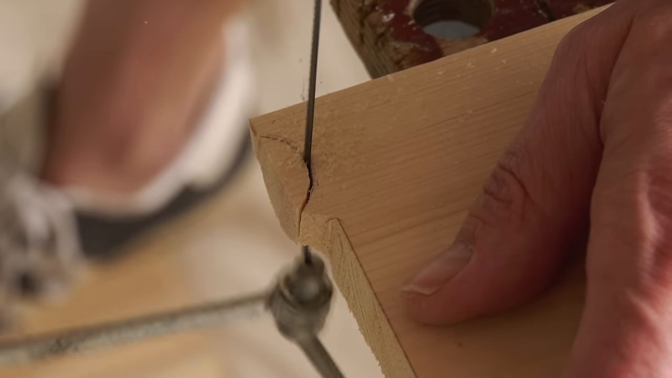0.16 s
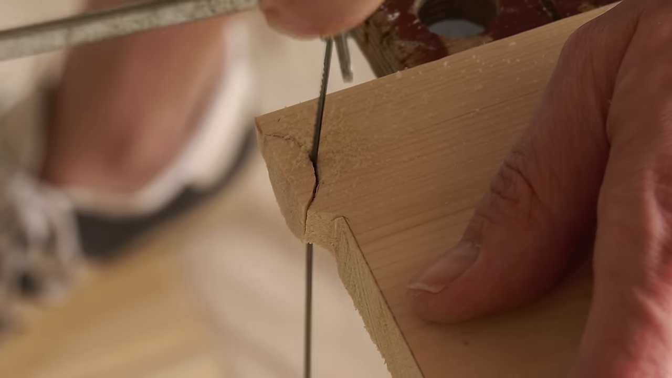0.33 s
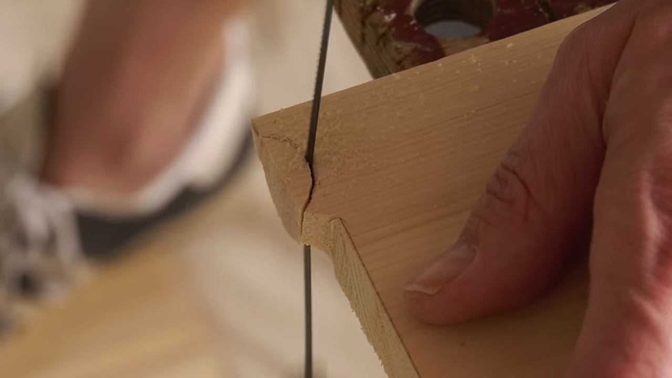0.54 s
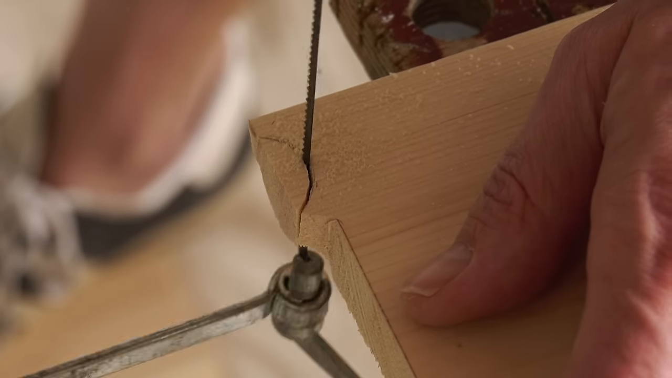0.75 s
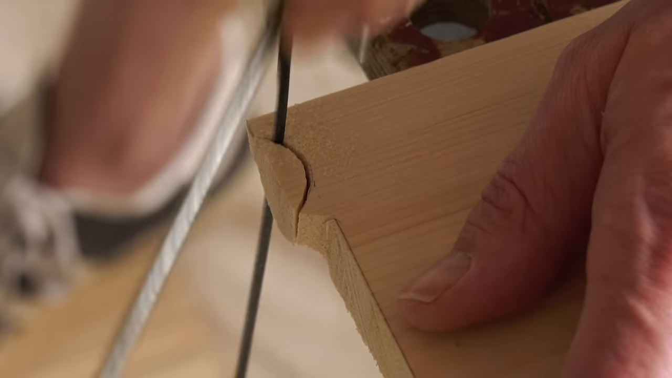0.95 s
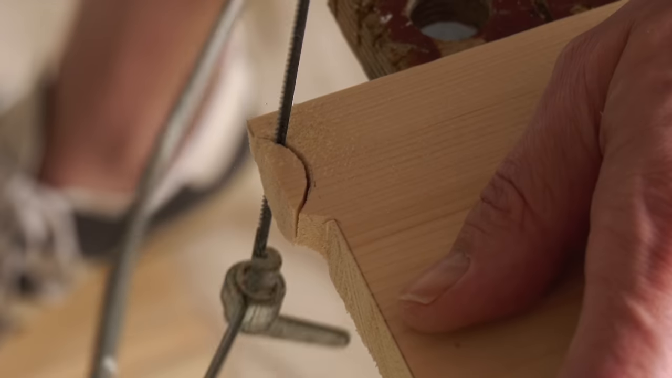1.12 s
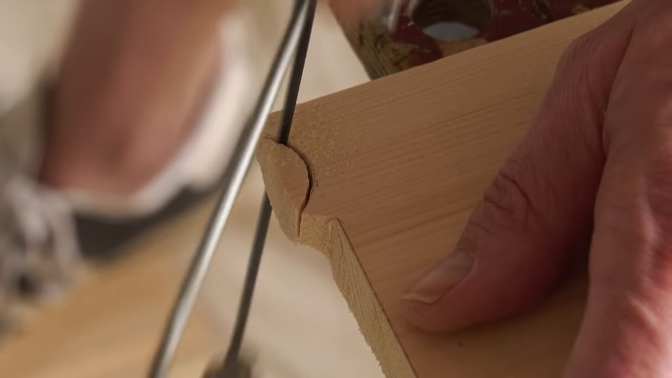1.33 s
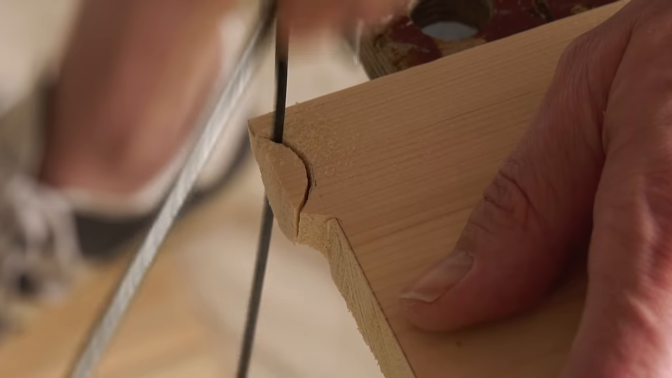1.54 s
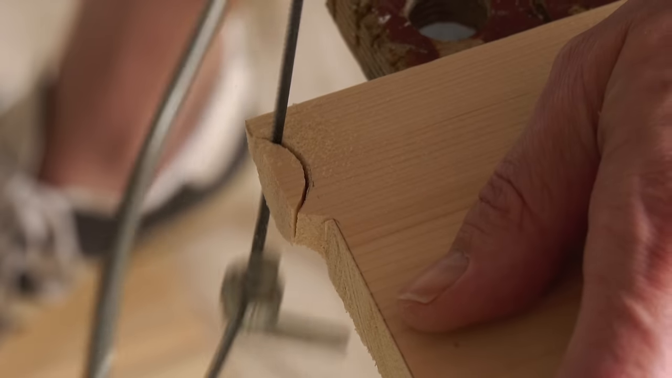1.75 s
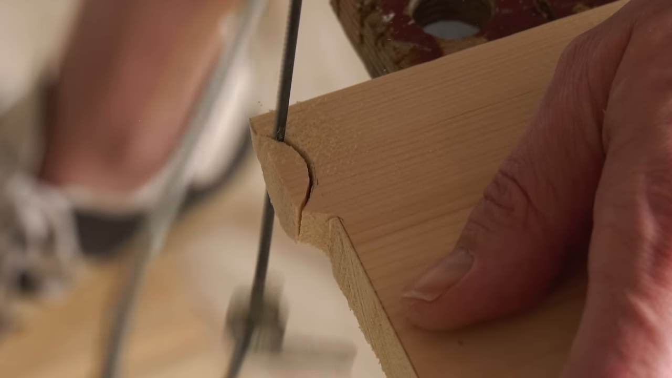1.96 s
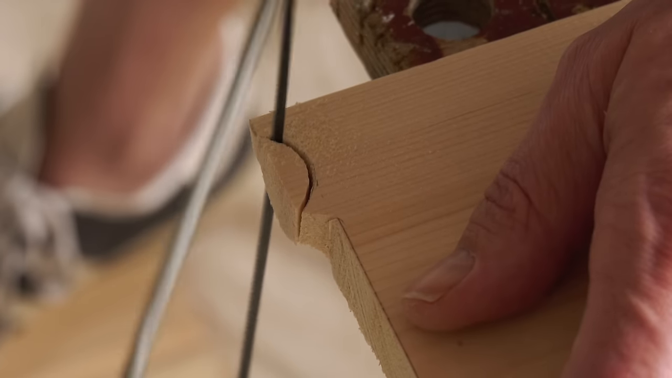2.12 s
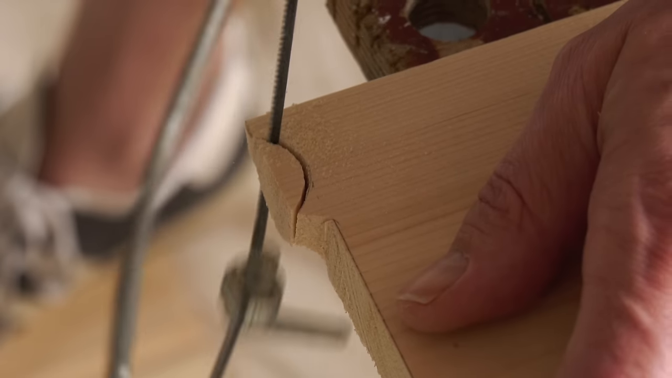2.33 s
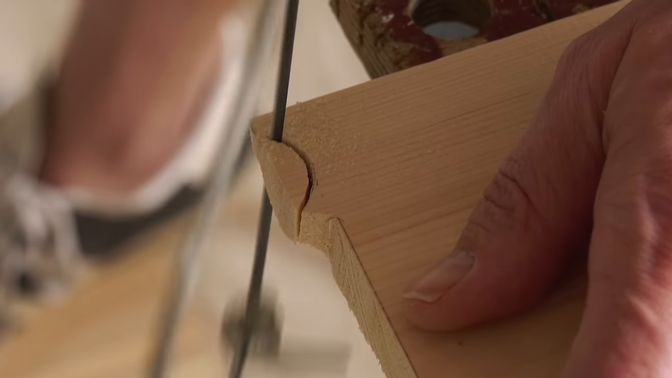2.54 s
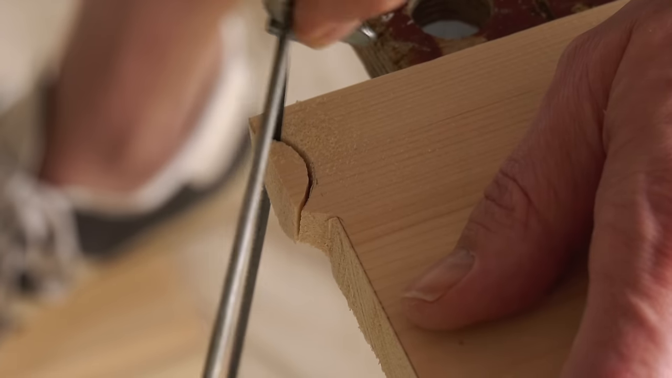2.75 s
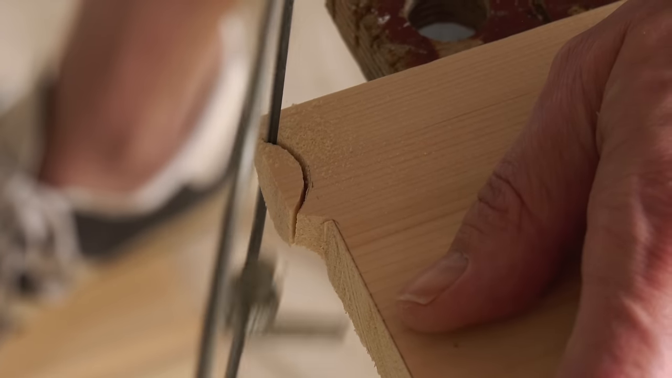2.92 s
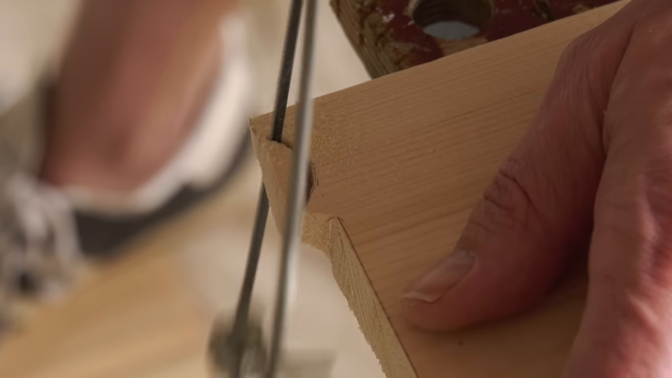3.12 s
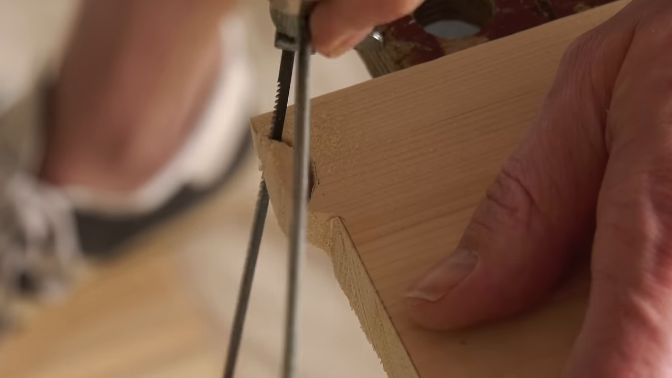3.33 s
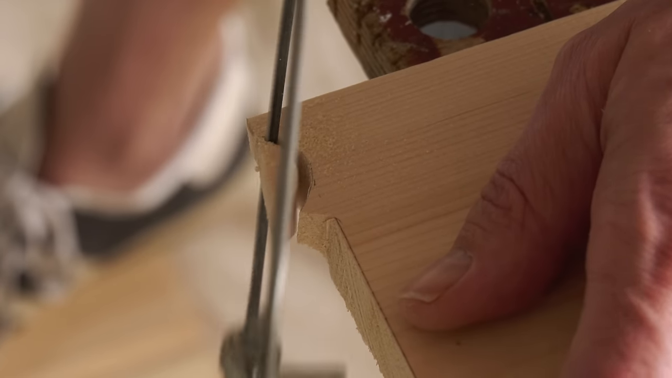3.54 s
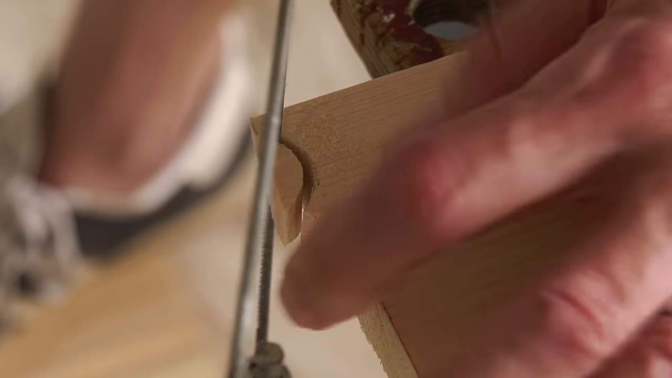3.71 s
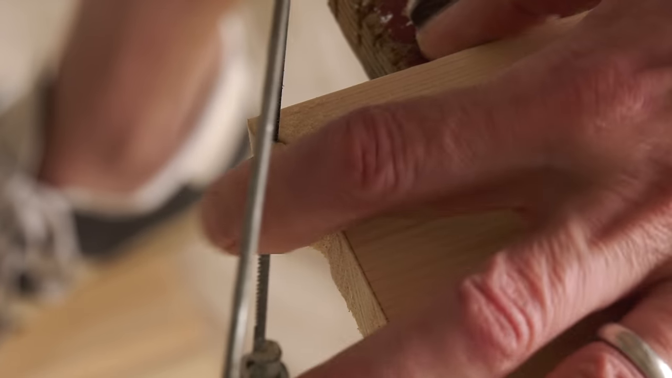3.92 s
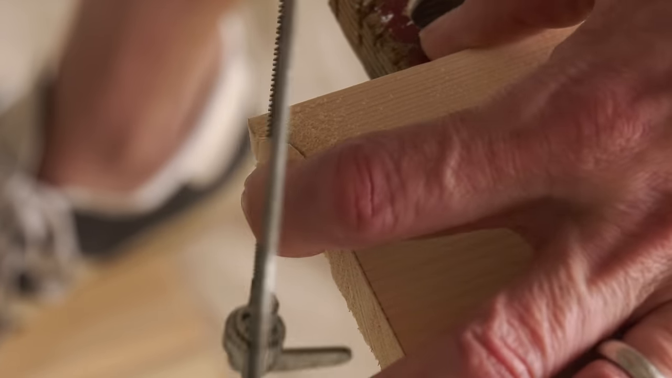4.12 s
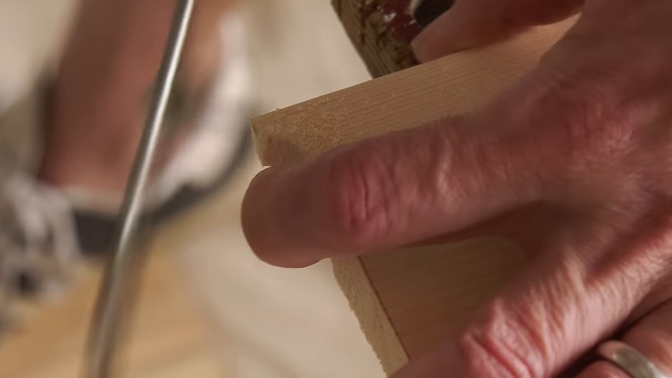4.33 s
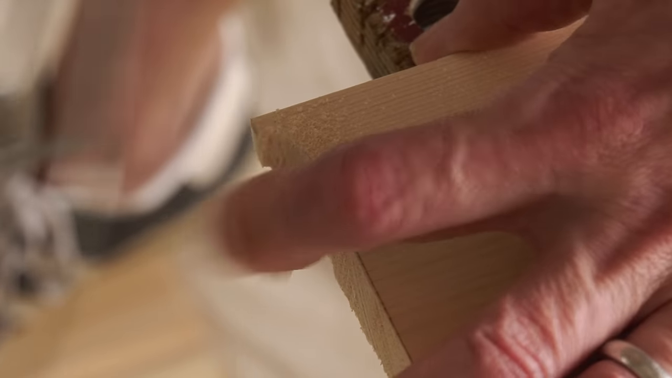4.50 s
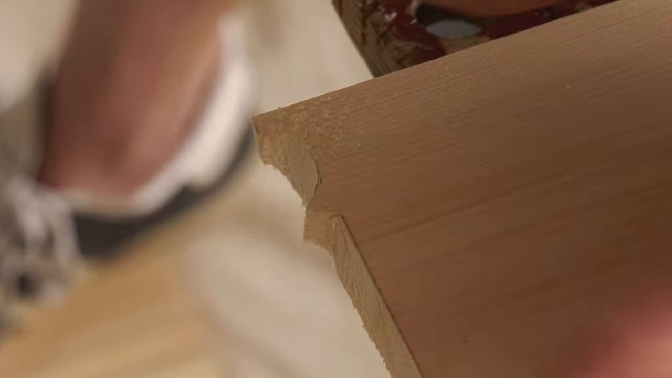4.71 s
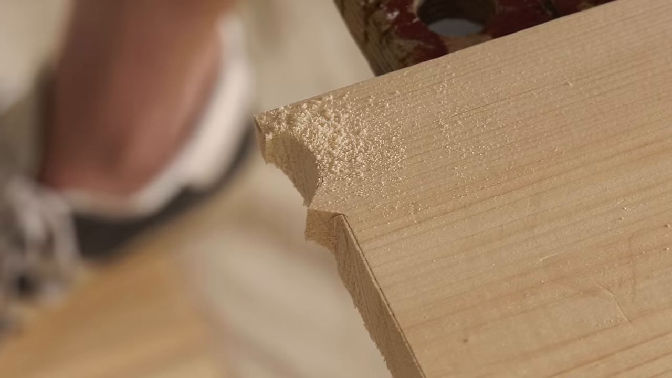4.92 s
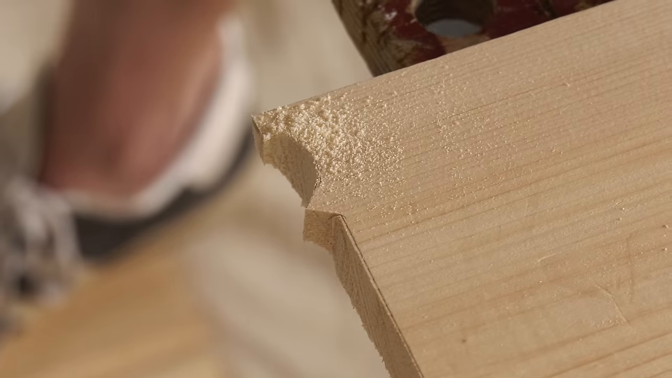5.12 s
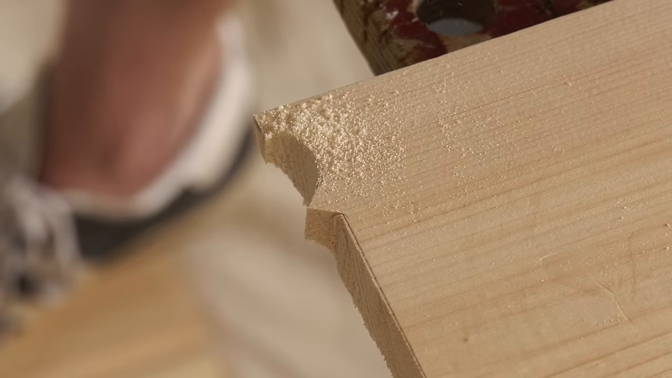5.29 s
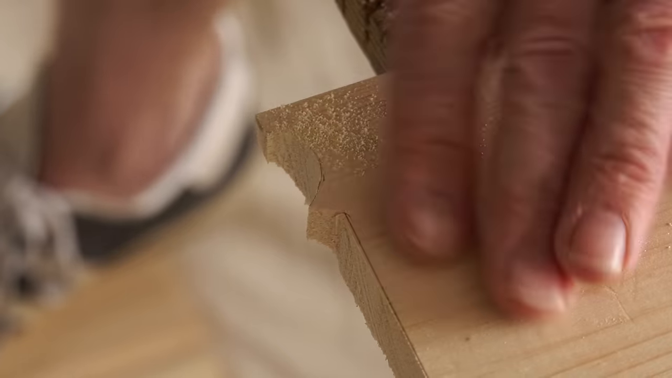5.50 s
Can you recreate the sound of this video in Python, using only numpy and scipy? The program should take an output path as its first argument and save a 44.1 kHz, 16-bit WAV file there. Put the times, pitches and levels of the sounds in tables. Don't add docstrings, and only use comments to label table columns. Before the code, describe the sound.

A coping saw rasps in quick buzzing strokes through softwood, softens, is wriggled free with a snap, then an offcut drops and fingers wipe dust.

```python
import sys
import numpy as np
from scipy import signal
from scipy.fft import rfft, irfft, next_fast_len
from scipy.io import wavfile

SR = 44100
rng = np.random.default_rng(int(sys.argv[2]) if len(sys.argv) > 2 else 0)


def decibels_to_gain(level_db):
    exponent = np.asarray(level_db, float) / 20
    return 10 ** exponent


def wav_record(signal):
    frames = np.transpose(np.atleast_2d(signal))
    bounded = np.clip(frames, -1, 1)
    quanta = np.round(bounded * 32767).astype(np.int16)
    wavfile.write(sys.argv[1], SR, quanta)


N = 249585
TIME = np.arange(N) / SR
PADDED = next_fast_len(N + SR)
HZ = np.maximum(np.arange(PADDED // 2 + 1) * SR / PADDED, 1)

# start_s, length_s, top_teeth_per_s, bite_db, grit_db
PULLS = [(-.03, .12, 530, -17, -31), (0.256, .121, 552, -13, -34.5), (0.542, .116, 530, -17, -36),
         (0.819, .133, 460, -30, -37.5), (0.942, .115, 570, -25, -30), (1.23, .12, 550, -28.5, -31.5),
         (1.52, .125, 590, -26.5, -31), (1.823, .116, 590, -31.5, -28.5), (2.115, .12, 580, -31.5, -29),
         (2.408, .127, 510, -31, -28.5), (2.7, .122, 510, -33, -29.5), (2.992, .117, 592, -27, -28),
         (3.292, .12, 400, -36.5, -33), (3.57, 0.11328, 492.7, -40, -47.5), (4.061, .14, 510, -43, -75),
         (4.233, 0.11455, 502.2, -44.5, -45)]
# brake_s, strike_sharpness_db, double_strike_db, catch_db (teeth catch as arm brakes)
PULL_FORM = [(.05, 2.5, 5, 4), (.058, -2, 1.5, 4.5), (0.05, 0, 4.5, 2.5), (0.056, 3.5, -12, 7),
             (.042, 0, 0, 5.5), (0.05, -4, -8.5, 8.5), (0.056, -1, -10.5, 7.5), (0.041, 1.5, -3, 7),
             (0.033, -7.5, -11, -0.5), (0.03315, -12.5, 7.5, -2.5), (0.054, -1.5, 0, 5.5),
             (.048, -15.5, 2.5, 8.5), (.07, 1.5, 4.5, 3), (0.0504, -10, -8, 0.1), (.055, 2, 0, -2),
             (.057, 6.5, -2, 5)]
# start_s, length_s, top_teeth_per_s, bite_db, grit_db
PUSHES = [(0.096, .14, 455, -33, -43), (0.384, 0.14, 440, -29.5, -43), (0.664, 0.135, 470, -30.5, -40),
          (1.066, .14, 450, -43.5, -37.5), (1.36, 0.14, 425, -48.5, -37.5), (1.656, .142, 465, -45, -36.5),
          (1.949, .145, 420, -54, -35), (2.257, 0.132, 350, -44.5, -35), (2.548, .138, 445, -42, -34),
          (2.834, .14, 460, -46.5, -33.5), (3.121, 0.145, 403, -33.5, -37), (3.407, 0.15, 430, -47, -44.5)]
# time_s, grit_into_board_db, bench_rumble_db, overtones_db, blade_sizzle_db
GRIP = [
    (0, 8, -12, -7.5, -7),
    (.45, 6, -10, -8.5, 0.5),
    (.9, 1.5, -13, -4, -1.5),
    (1.35, 2.2, -17.5, 6.5, 1.5),
    (1.8, -0.2, -17.5, 2.5, 0),
    (2.3, 1, -14, 9.5, -2),
    (2.8, -0.7, -20, 4.5, -2),
    (3.2, 1, -11, 2.5, -0.5),
    (3.7, 8.5, -22.5, -11, 1.5),
    (4.3, 8, -28, 0.5, 6.5),
]
# pitch_hz, width_hz, level_db
BOARD_MODES = [(352.3, 52, -1.5), (439.3, 28.5, 1.5), (502, 25.3, -2), (710, 82, 1.5), (830, 90, -3),
               (1003, 64, -0.5), (1217, 74, 0), (1372, 176, -2.5), (1724, 222, -3.5), (2665, 685, -6.5),
               (464.4, 26.2, -1), (1043, 42, -2)]
# pitch_hz, level_db
FACE_COLOUR = [(200, -25.5), (450, -11), (750, -6.5), (1100, 3), (1800, -16), (3000, -10), (6000, -18)]
# pitch_hz, width_hz, level_db
BLADE_MODES = [(3000, 234, 1), (3460, 260, 3), (3994, 314, 2.5), (5107, 800, -1.5), (6550, 440, -5),
               (7880, 3200, -12), (11450, 750, -25), (13800, 5700, -37)]
# pitch_hz, width_hz, level_db
BENCH_MODES = [(78.6, 40, -31), (121.4, 16.8, -3.5), (174.2, 19, 3), (226.5, 290, -16.5)]
# pitch_hz, level_db (per Hz)
HUSH_COLOUR = [(15, -34), (25, -7), (74, -1), (516, 2.5), (818, -2), (1700, -9), (1890, -12.5), (3920, -13),
               (11000, -24.5), (13200, -15), (16000, -28.5)]
# start_s, level_db, pitch_hz, t60_s
BUMP = [
    (.932, -30.5, 70, 0.019),
]
# start_s, level_db
KNOCKS = [
    (.929, 3.5),
    (0.993, -7),
    (2.422, -2),
    (2.472, 2),
    (4.1573, -5.5),
]
# start_s, length_s, peak_db
RUBS = [
    (3.64, 0.34, -60.5),
    (4.75, 0.27, -59.5),
    (5.04, 0.124, -62),
    (5.14, 0.3, -57.5),
]
# start_s, length_s, peak_db
WIPE = [
    (5.55, 0.26, -33),
]
# pitch_hz, level_db (per Hz)
SKIN_COLOUR = [(88, -57), (150, -16), (555, -15), (1480, -7.5), (1630, -13), (2400, -7.5), (2810, -11),
               (5680, -6.5), (16000, -15.5)]
# start_s, length_s, peak_db
LAST_SCRAPES = [
    (4.045, 0.17, -40),
    (4.225, 0.11, -32.5),
]
# pitch_hz, level_db (per Hz)
KERF_COLOUR = [(65, -26), (150, -12.5), (320, -10.5), (514, -5.5), (902, -12.5), (981, -13), (1580, -19),
               (3020, -23.5), (4400, -28), (5650, -22), (7250, -36), (10800, -31), (16000, -44)]
# start_s, peak_db, t60_s, low_edge_hz
TICKS = [(4.077, -52, 0.0072, 1510), (4.0882, -42, .008, 1500), (4.1121, -43, .008, 1490),
         (4.1315, -36, 0.0063, 3000), (4.153, -39, 0.015, 4370), (4.1545, -26.5, 0.014, 3560),
         (4.252, -37, 0.0051, 1500), (4.257, -39, .008, 3000), (4.2698, -29, 0.0099, 1980),
         (4.3095, -33, 0.017, 4000), (4.311, -30.5, 0.0073, 4950), (4.3111, -15.5, 0.0086, 3840),
         (4.312, -25, 0.013, 3950), (4.797, -48, 0.017, 3500), (4.914, -34, 0.013, 1540),
         (4.961, -28.5, 0.0029, 3000)]
# start_s, peak_db
DROP = [
    (4.9602, -19),
    (4.976, -35),
    (4.995, -39),
    (5.035, -43.5),
]
# pitch_hz, width_hz, level_db
OFFCUT_MODES = [(319, 60, 4.5), (404, 51, 6.5), (513, 85, 3.5), (637, 64, 8.5), (760, 170, 1),
                (954, 100, 5), (1257, 47, 8), (1580, 110, 5), (1920, 97, 3.5), (2380, 920, -0.5),
                (4800, 1700, -3.5), (8300, 4300, -36)]
# pitch_hz, t60_s
SHOP_T60 = [(90, 0.72), (200, 0.89), (450, 0.75), (1000, 0.66), (2200, 0.53), (5000, 0.11), (11000, 0.19)]
# pitch_hz, angle_rad (toward the side signal)
PORTS = [(100, 0.013), (3000, 0.28), (6000, 0.45), (9000, 0.89), (11500, 2.18), (15000, 1.6)]
# time_s, left_minus_right_db
DRIFT = [
    (0, 5),
    (.8, 6.5),
    (1.1, 3),
    (3.4, -.5),
    (5.66, -7.5),
]


def rms_one(x):
    return x / np.sqrt(np.mean(x ** 2) + 1e-20)


def response_rms_one(response):
    return response / np.sqrt(np.mean(abs(response) ** 2))


def lowpass(x, hz, order=2):
    return signal.sosfilt(signal.butter(order, hz, fs=SR, output="sos"), x)


def highpass(x, hz):
    return signal.sosfilt(signal.butter(2, hz, "high", fs=SR, output="sos"), x)


def at_hz(points):
    hz, value = np.transpose(points)
    return np.interp(np.log(HZ), np.log(hz), value)


def through(x, response):
    return irfft(rfft(x, PADDED) * response, PADDED)[..., :N]


def body(modes):
    total = 0
    for k, (hz, width, db) in enumerate(modes):
        damping = 1j * width * HZ
        total = total + (-1) ** k * decibels_to_gain(db) * damping / (hz ** 2 - HZ ** 2 + damping)
    return response_rms_one(total)


def flicker(rate_hz, depth_db):
    settle = 4000
    slow = lowpass(rng.standard_normal(N + settle), rate_hz)[settle:]
    return decibels_to_gain(depth_db * rms_one(slow))


def strokes(table, overtones, fall, late, later, surge, uneven_db):
    catch_at, catch_spread, catch_grit, heavy_lag = 0.81, 0.064, 0.74, 0.096
    rate, push, double, edge, grit = np.zeros((5, N))
    for start, rise_s, brake_s, sharp_db, double_db, catch_db, top_hz, bite_db, grit_db in table:
        fastest = start + rise_s
        stop = fastest + brake_s
        span = slice(max(int(start * SR), 0), int(stop * SR))
        now = TIME[span]
        speed = np.sin(np.pi / 2 * np.interp(now, [start, fastest, stop], [0, 1, 0])) ** 0.8
        dug = np.clip((now - start) / (stop - start), 0, 1)
        catch_now_db = catch_db * np.exp(-((dug - catch_at) / catch_spread) ** 2)
        heavy_db = 1.07 * catch_db * np.exp(-((dug - catch_at - heavy_lag) / catch_spread) ** 2)
        strike = decibels_to_gain(bite_db + sharp_db + 4 + catch_now_db) * speed ** 1.5
        waiting = dug ** (4.2 * late) * (dug / 0.85) ** min(later * max(start, 0), 2.5)
        bearing_down = 1 + surge * dug ** 9.6
        rate[span] += top_hz * speed
        push[span] += decibels_to_gain(bite_db + 15 + heavy_db) * speed ** 1.2 * waiting
        double[span] += decibels_to_gain(double_db) * strike * speed * dug ** (0.5 * late)
        edge[span] += strike * (1.45 - dug)
        grit[span] += decibels_to_gain(grit_db - 1.5 + catch_grit * catch_now_db) * speed ** fall * bearing_down
    turn = 2 * np.pi * np.cumsum(rate * flicker(100, uneven_db)) / SR
    harmonic_db = [-3.0, -10.5, -12.0, -4.5, -7.5, -13]
    sharp = sum(decibels_to_gain(db) * np.cos(k * turn) for k, db in enumerate(harmonic_db, 3))
    buzz = push * np.cos(turn) + overtones * (double * np.cos(2 * turn) + edge * sharp)
    fibres = rng.standard_normal(N) * decibels_to_gain(1.8 * rng.standard_normal(N)) * (1 + 0.5 * np.cos(turn))
    return decibels_to_gain(-12) * buzz * flicker(50, 1.5), grit * rms_one(fibres) * flicker(60, 0.7), rate


def pull_strokes(overtones):
    table = []
    for (start, length, *rest), (brake, *form) in zip(PULLS, PULL_FORM):
        table.append((start, length - brake, brake, *form, *rest))
    return strokes(table, overtones, fall=1.0, late=0.85, later=4.2, surge=1.0, uneven_db=0.1)


def push_strokes(overtones):
    brake_s, sharp_db, double_db, catch_db = 0.065, 3.5, -2, 0
    table = [(start, length - brake_s, brake_s, sharp_db, double_db, catch_db, *rest)
             for start, length, *rest in PUSHES]
    buzz, grit, rate = strokes(table, overtones, fall=0.55, late=0.2, later=0, surge=0.14, uneven_db=0.2)
    return buzz, 0.97 * grit + 0.37 * lowpass(grit, 6100), rate


def ringing_board(buzz, grit, grit_db):
    ringing = body(BOARD_MODES)
    board = through(decibels_to_gain(-3.0) * buzz + decibels_to_gain(grit_db) * grit * flicker(43, 1.1), ringing)
    low_gain = np.sqrt(np.mean(abs(ringing[HZ < 2000]) ** 2))
    return board + through(buzz, decibels_to_gain(-6 + at_hz(FACE_COLOUR)) * low_gain)


def ringing_blade(buzz, grit, sizzle_db):
    patch_hz, sizzle_hz = 604, 5900
    modes = body(BLADE_MODES)
    share = np.cos(np.pi / 2 * HZ / patch_hz) ** 2
    blade = decibels_to_gain(-6) * through(buzz * flicker(38, 3.2), modes)
    for patches in (share, 1 - share):
        flaring = decibels_to_gain(4.0) * grit * flicker(37, 1.8) * flicker(4.5, 0.33)
        blade = blade + through(flaring, patches * modes)
    sizzle = through(blade, 1 / (1 + (sizzle_hz / HZ) ** 6))
    return blade + (decibels_to_gain(sizzle_db) - 1) * sizzle


def bench_rumble(rate, level_db):
    shaking = decibels_to_gain(level_db - 34.0) * (rate / 450) ** 0.18 * rng.standard_normal(N)
    return through(shaking, body(BENCH_MODES))


def saw():
    times, *columns = np.transpose(GRIP)
    board_db, bench_db, overtone_db, sizzle_db = (np.interp(TIME, times, column) for column in columns)
    overtones = decibels_to_gain(overtone_db)
    buzz, grit, rate = np.add(pull_strokes(overtones), push_strokes(overtones))
    board = ringing_board(buzz, grit, board_db)
    return board + ringing_blade(buzz, grit, sizzle_db) + bench_rumble(rate, bench_db)


def hush():
    return decibels_to_gain(-61.5) * rms_one(through(rng.standard_normal(N), decibels_to_gain(at_hz(HUSH_COLOUR))))


def shop(x):
    after, echoes = np.arange(SR) / SR, 0
    for hz, t60 in SHOP_T60:
        band = signal.butter(1, [hz / 1.49, hz * 1.376], "band", fs=SR, output="sos")
        echoes = echoes + signal.sosfilt(band, rng.standard_normal(SR)) * decibels_to_gain(-60 * after / t60)
    echoes = echoes * (1 - np.exp(-after / 0.003))
    return through(x, rfft(echoes / np.sqrt(np.sum(echoes ** 2)), PADDED))


def impulses(rows, gain_db):
    taps = np.zeros(N)
    for start, db in rows:
        taps[int(start * SR)] = decibels_to_gain(db + gain_db)
    return taps


def bump():
    start, db, hz, t60 = BUMP[0]
    after = np.maximum(TIME - start, 0)
    thud = decibels_to_gain(db - 60 * after / t60) * np.sin(2 * np.pi * hz * after)
    cushion_hz = 1300
    return thud + through(impulses(KNOCKS, 0), body(BOARD_MODES) / (1 + 1j * HZ / cushion_hz) ** 2)


def swells(rows, pointed):
    total = np.zeros(N)
    for start, length, db in rows:
        along = np.clip((TIME - start) / length, 0, 1)
        total += decibels_to_gain(db) * np.sin(np.pi * along) ** pointed
    return total


def friction(gain, colour, grain_db):
    grain = rng.standard_normal(N) * decibels_to_gain(grain_db * rng.standard_normal(N))
    return gain * rms_one(through(grain, decibels_to_gain(at_hz(colour))))


def hand_on_wood():
    gain = swells(RUBS, pointed=0.78) + swells(WIPE, pointed=5.1)
    return friction(gain, SKIN_COLOUR, grain_db=5.0)


def last_scrapes():
    return friction(swells(LAST_SCRAPES, pointed=2.06), KERF_COLOUR, grain_db=2.0)


def ticks():
    out, white = np.zeros(N), rng.standard_normal(N)
    for start, db, t60, low_hz in TICKS:
        decay = decibels_to_gain(db - 60 * np.maximum(TIME - start, 0) / t60) * (TIME >= start)
        out += highpass(decay * white, low_hz)
    return lowpass(out, 11500, order=4)


def offcut():
    return through(impulses(DROP, 9.5), body(OFFCUT_MODES))


def two_ports(mid, wide):
    after = np.arange(2600) / SR
    scatter = rng.standard_normal(2600) * decibels_to_gain(-60 * after / 0.08)
    angle = at_hz(PORTS) / 2
    same = through(mid, np.cos(angle))
    apart = through(mid, np.sin(angle) * response_rms_one(rfft(scatter, PADDED)))
    side = decibels_to_gain(-2.0) * apart * flicker(140, 4.7) + wide
    pan_db = np.interp(TIME, *np.transpose(DRIFT))
    return np.array([decibels_to_gain(pan_db / 2) * (same + side), decibels_to_gain(-pan_db / 2) * (same - side)])


def scene():
    near = saw() + bump() + hand_on_wood() + last_scrapes()
    snaps, drop = ticks(), offcut()
    sent = decibels_to_gain(-6.5) * near + decibels_to_gain(2.0) * drop + decibels_to_gain(-8.5) * snaps
    mid = near + drop + snaps + shop(sent) + hush()
    return two_ports(mid, wide=decibels_to_gain(-42) * shop(sent))


def low_pass(x):
    return signal.sosfilt(signal.butter(12, 16360, fs=SR, output="sos"), x)


def record(dry):
    bass_cut = highpass(dry, 40)
    mix = signal.sosfilt(signal.cheby2(14, 60, 16200, fs=SR, output="sos"), bass_cut)
    return low_pass(mix)


dry = scene()
out = record(dry)
wav_record(out)
```